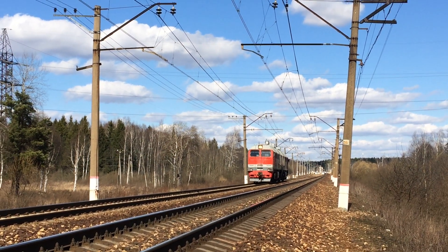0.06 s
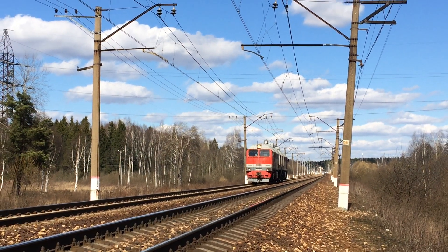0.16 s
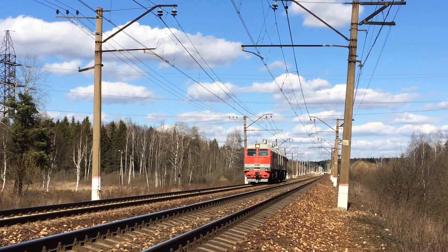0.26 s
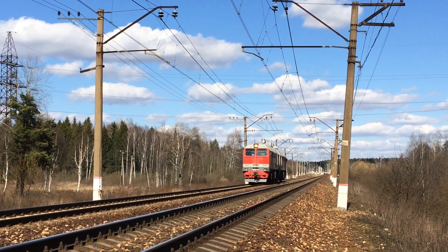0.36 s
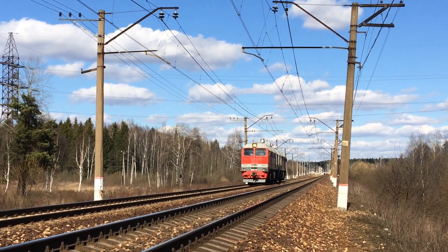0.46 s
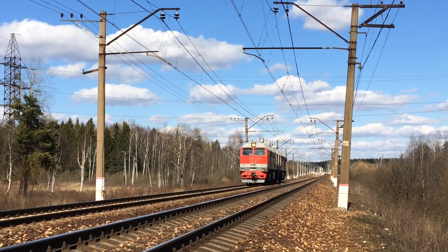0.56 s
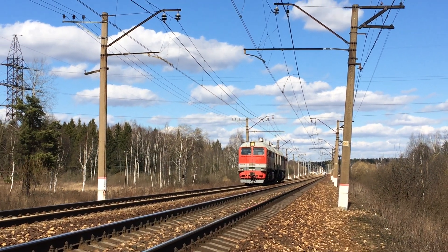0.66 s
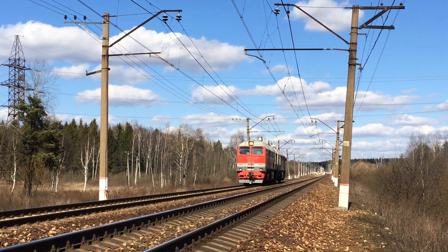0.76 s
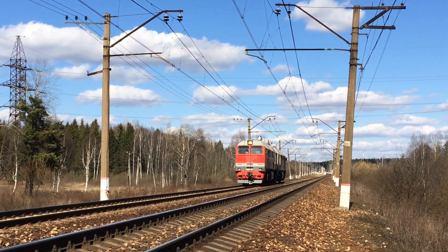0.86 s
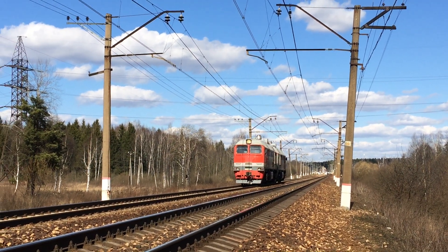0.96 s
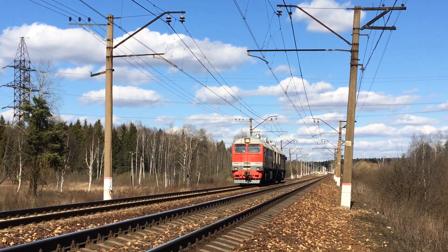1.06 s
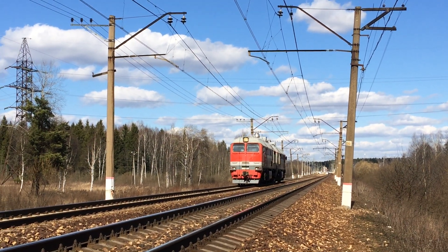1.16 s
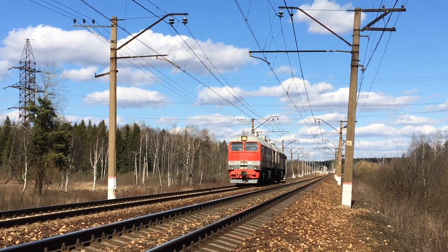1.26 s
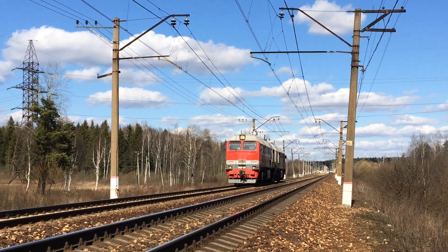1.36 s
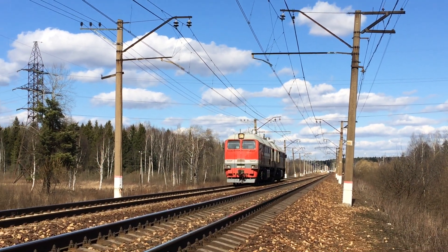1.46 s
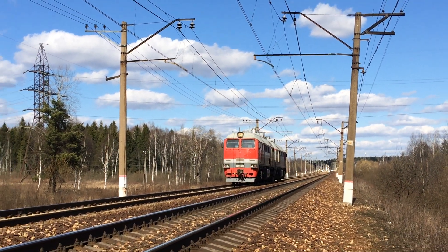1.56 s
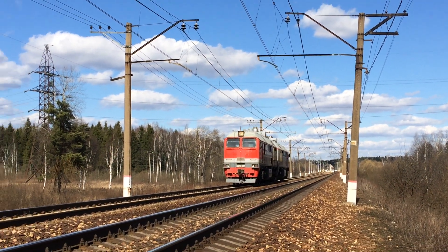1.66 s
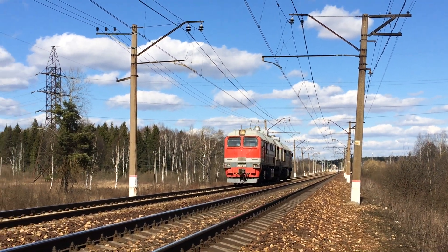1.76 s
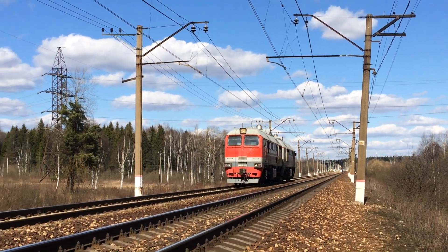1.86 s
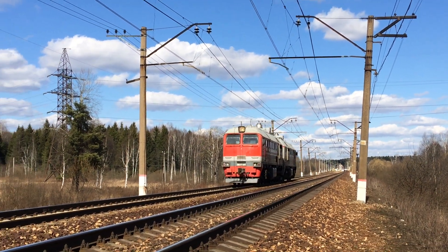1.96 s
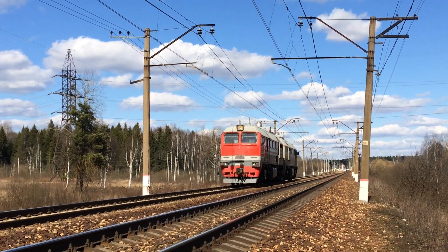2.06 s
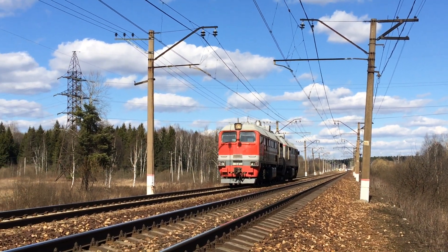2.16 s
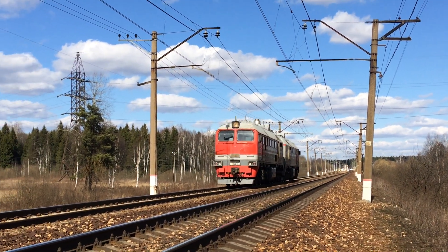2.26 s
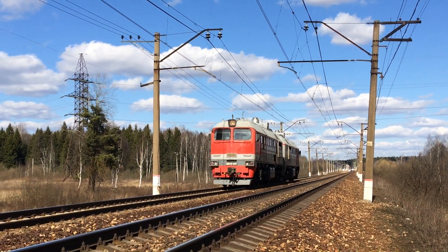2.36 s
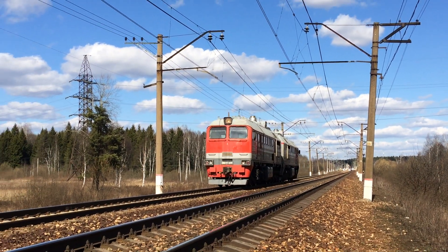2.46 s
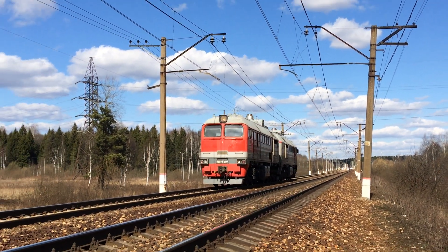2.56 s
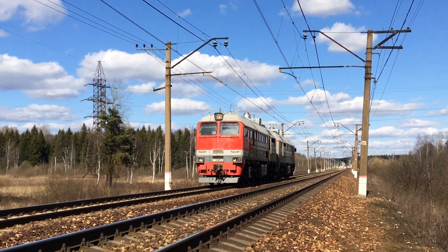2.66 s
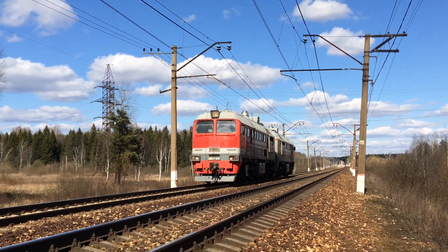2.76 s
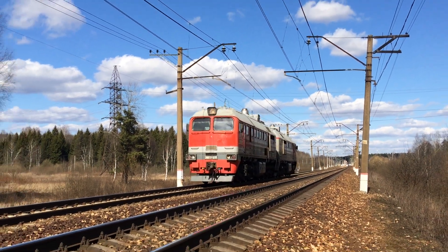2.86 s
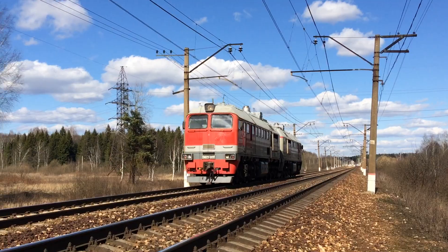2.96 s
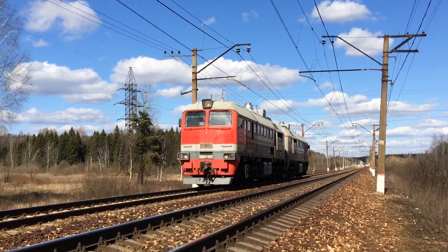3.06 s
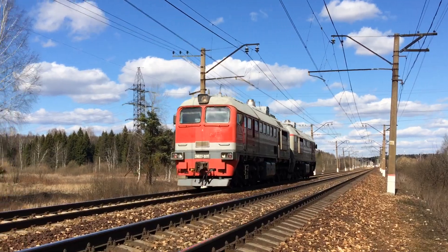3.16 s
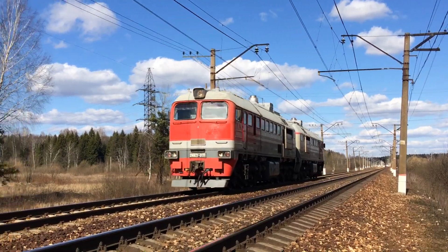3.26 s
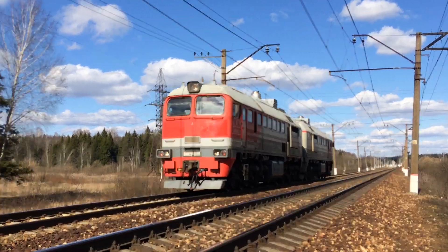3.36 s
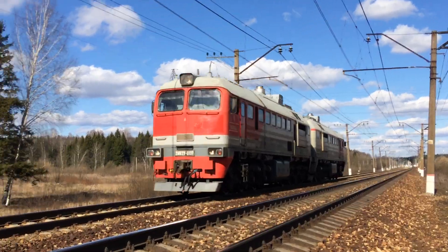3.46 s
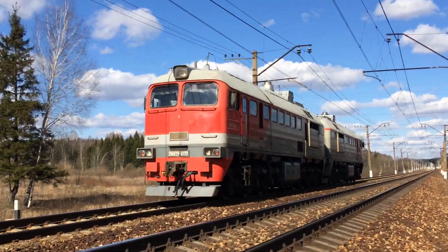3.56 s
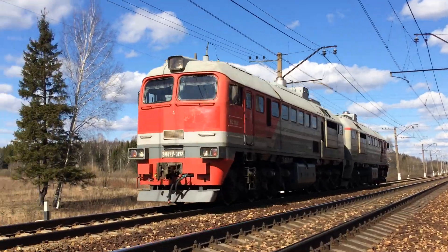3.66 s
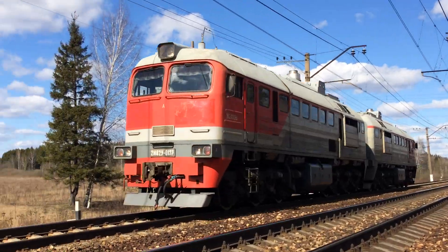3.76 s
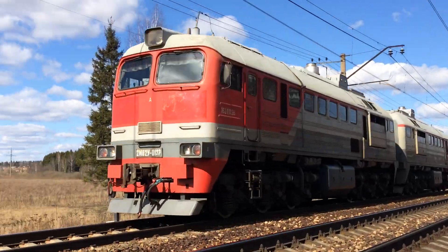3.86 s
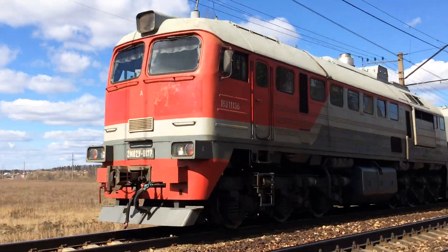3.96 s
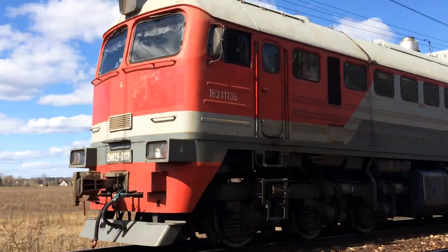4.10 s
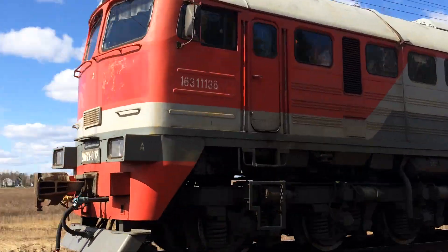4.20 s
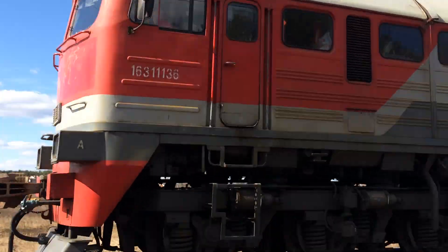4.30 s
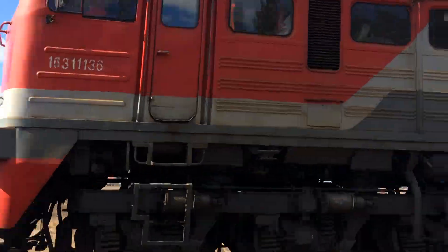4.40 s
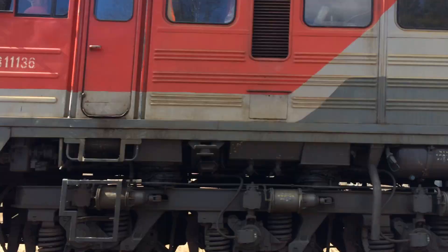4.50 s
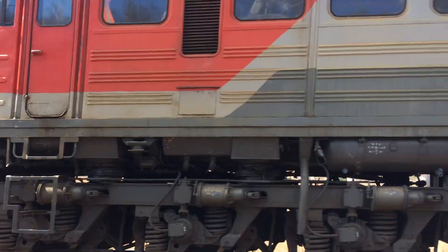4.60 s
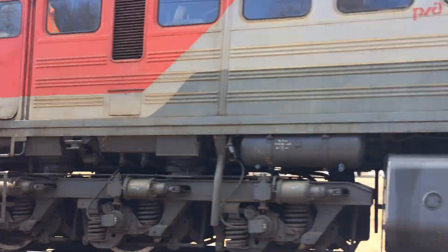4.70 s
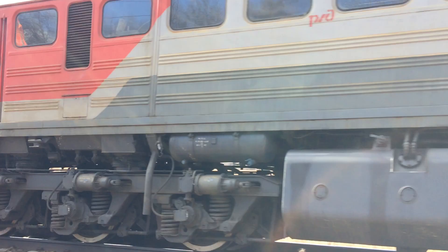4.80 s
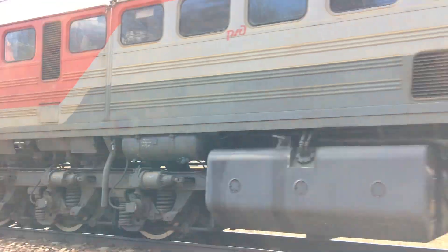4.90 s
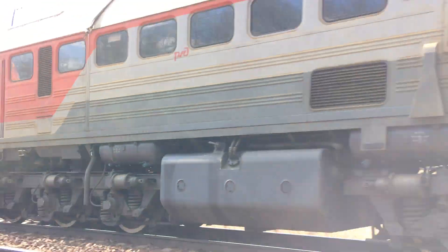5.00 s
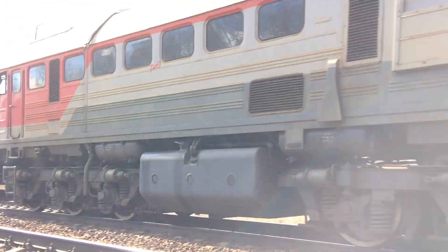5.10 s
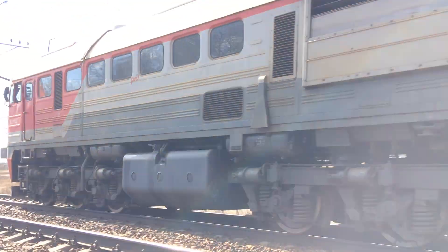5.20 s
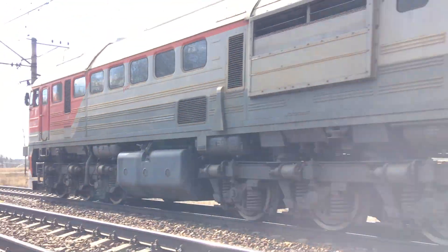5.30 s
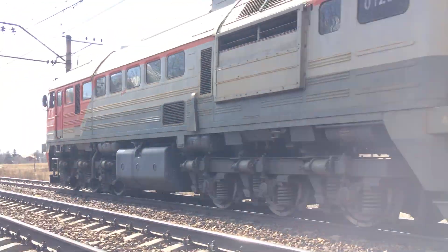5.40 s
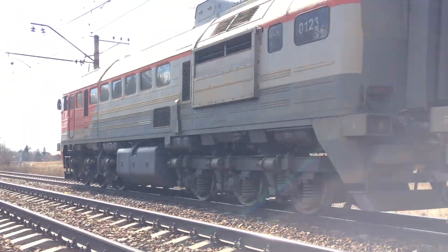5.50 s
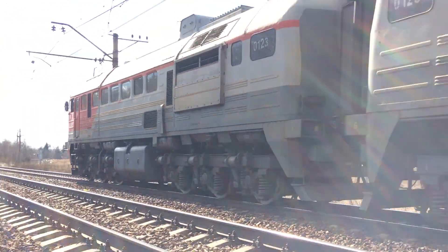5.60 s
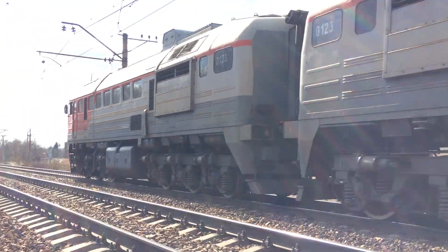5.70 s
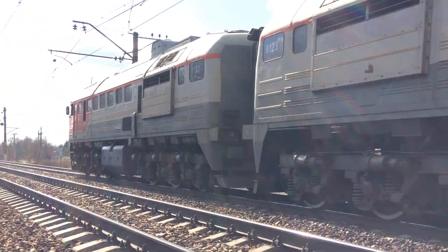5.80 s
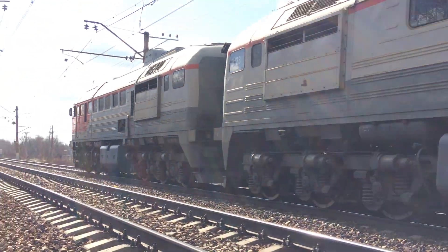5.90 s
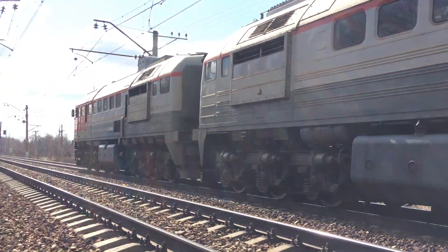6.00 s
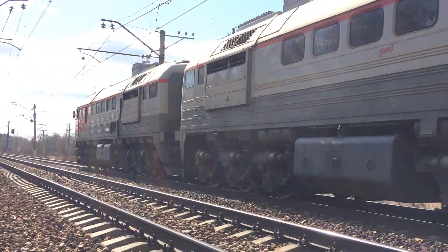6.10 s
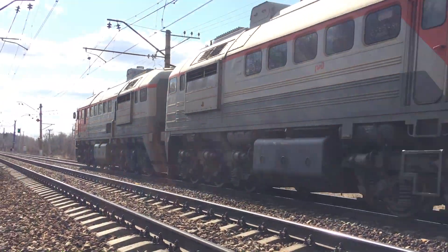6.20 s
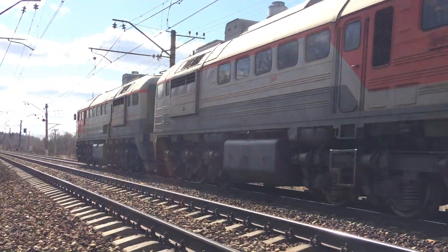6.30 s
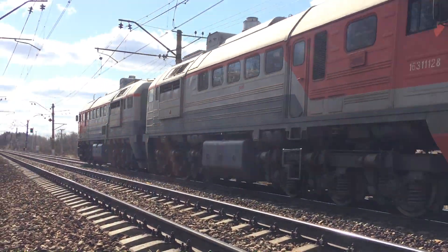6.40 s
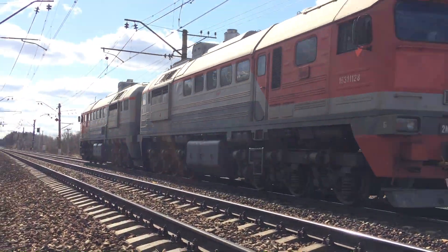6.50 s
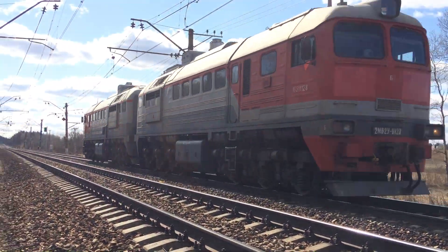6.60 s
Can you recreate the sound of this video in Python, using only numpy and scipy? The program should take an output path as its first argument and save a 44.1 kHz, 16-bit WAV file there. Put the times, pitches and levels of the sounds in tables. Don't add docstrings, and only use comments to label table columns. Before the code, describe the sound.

Outdoors beside a railway at a wood's edge, a small trackside microphone hears faint, dull rolling and a low engine flutter slowly approaching. One short, shrill air-whistle toot sounds and echoes softly from the trees. The rumble then rises quickly into a close, rough roar, with wheels beating about six times a second, frame groans, a metal clang, exhaust pops and a quick double spit of air. It stays loud to the end, easing only slightly.

```python
import sys
import numpy as np
from scipy import signal
from scipy.fft import rfft, irfft, next_fast_len
from scipy.io import wavfile

SR = 44100
rng = np.random.default_rng(int(sys.argv[2]) if len(sys.argv) > 2 else 0)


def materialize(psi):
    bounded = np.clip(np.atleast_2d(psi).T, -1, 1)
    quanta = np.round(bounded * 32767).astype(np.int16)
    wavfile.write(sys.argv[1], SR, quanta)


def natural_amplitude(level_db):
    exponent = np.asarray(level_db, float) / 20
    return 10 ** exponent


N = 293265
TIME = np.arange(N) / SR


def unit_rms(x):
    return x / np.sqrt(np.mean(x ** 2) + 1e-20)


def in_time(rows):
    s, *columns = np.transpose(rows)
    return [np.interp(TIME, s, column) for column in columns]


def drift(rate):
    pole = np.exp(-80 * np.pi * rate / SR)
    draws = rng.standard_normal(N // 40 + 2002)
    slow = signal.lfilter([1], [1, -2 * pole, pole * pole], draws)[2000:]
    return np.interp(np.arange(N) / 40, np.arange(len(slow)), unit_rms(slow))


def noise(spectrum, patchy_db=0.0, low_hz=None, high_hz=None):
    size = next_fast_len(N)
    octave = np.log2(np.arange(size // 2 + 1) * SR / size + 1)
    hz, level_db = np.transpose(spectrum)
    colour_db = np.interp(octave, np.log2(hz), level_db, left=-99, right=-99)
    lines = rfft(rng.standard_normal(size)) * natural_amplitude(colour_db)
    start, stop = np.log2(low_hz or hz[0]), np.log2(high_hz or hz[-1])
    out = 0
    for centre in np.arange(start, stop + .25, .5):
        band = np.cos(np.pi * np.clip(octave - centre, -.5, .5)) ** 2
        out = out + irfft(lines * band, size)[:N] * natural_amplitude(patchy_db * drift(19.6))
    return unit_rms(out)


def ring(at_s, heights, hz, t60):
    clicks = np.full(N, 1e-18)
    clicks[(np.atleast_1d(at_s) * SR).astype(int)] = heights
    pole, turn = natural_amplitude(-60 / (t60 * SR)), 2 * np.pi * hz / SR
    return signal.lfilter([0, np.sin(turn)], [1, -2 * pole * np.cos(turn), pole * pole], clicks)


def resonances(modes):
    out = 0
    for hz, width_hz, level_db in modes:
        pole, turn = np.exp(-np.pi * width_hz / SR), 2 * np.pi * hz / SR
        poles = [1, -2 * pole * np.cos(turn), pole * pole]
        sung = signal.lfilter([1, 0, -1], poles, rng.standard_normal(N))
        out = out + natural_amplitude(level_db + 4.7 * drift(26)) * unit_rms(sung)
    return unit_rms(out)


def swells(beats, rise_s, fall_s):
    out, coarse = 0, TIME[::32]
    for s, level_db in beats:
        late = coarse - s
        out = out + natural_amplitude(level_db) * np.exp(-.5 * (late / np.where(late < 0, rise_s, fall_s)) ** 2)
    return np.interp(TIME, coarse, out)


def surges(rows):
    return sum(swells([(s, level_db)], half_s, half_s) for s, level_db, half_s in rows)


def bell_db(at_s, rise_s, fall_s):
    late = TIME - at_s
    fall = 10 / np.log(10) * (late / np.where(late < 0, rise_s, fall_s)) ** 2
    return np.maximum(-fall, -99)


# time in seconds, rolling level in dB.
ROLLING_LEVEL = [(0.0, -48.5), (0.74, -46.5), (1.44, -43), (1.94, -43), (2.7, -40),
                 (3.2, -35), (4.1, -28), (4.4, -21.5), (5.16, -22), (5.78, -22), (6.28, -22.5), (6.5, -25), (6.65, -26)]


def nearing(share, early_s=0.0):
    s, level_db = np.transpose(ROLLING_LEVEL)
    abreast_db = -23
    return share * (np.interp(TIME + early_s, s, level_db) - abreast_db)


# time in seconds, level in dB.
VALVE_PUFFS = [(6.055, -33), (6.094, -33)]


def puffs(rise_s, t60):
    out = 0
    for s, level_db in VALVE_PUFFS:
        late = np.maximum(TIME - s + rise_s, 0)
        opening = np.minimum(late / rise_s, 1) ** 2
        out = out + opening * natural_amplitude(level_db - 60 * np.maximum(late - rise_s, 0) / t60)
    return out


# frequency in Hz, level in dB per Hz.
VALVE_COLOUR = [(5000, -33), (7500, -5), (9000, -12), (10200, -1), (12500, -4), (15500, -5)]
VALVE_TOP = [(11000, -25), (13000, 1), (14500, 0), (15500, 2)]
AIR_COLOUR = [(7000, -20), (9400, -3), (10300, 7), (11500, 6), (13000, 7.5), (15500, 4.5)]


def air():
    spit = puffs(rise_s=.006, t60=.26) * noise(VALVE_COLOUR, 1.0)
    thin_top = natural_amplitude(-8) * puffs(rise_s=.022, t60=.36) * noise(VALVE_TOP, 1.2)
    lost_db = 12 * np.clip((TIME - 4.8) / .25, 0, 1)
    hiss_db = -61.5 + nearing(0.46, 0.97) - lost_db
    return spit + thin_top + natural_amplitude(hiss_db) * noise(AIR_COLOUR, 1.6)


# time in seconds, level in dB.
GROAN_JOLTS = [(3.69, -17.5), (3.9, -22.5), (4.1, -22.5), (4.25, -12), (4.38, -22), (4.52, -13.5),
               (4.92, -12), (5.04, -18), (5.2, -20), (5.33, -17), (5.68, -25), (5.79, -20), (6.3, -20)]
# time in seconds, level in dB, half length in seconds.
LOUVRE_GUSTS = [(4.032, -42, .02), (4.37, -44, 0.045), (4.676, -46, 0.12), (4.935, -35, 0.01),
                (5.3, -46.5, 0.21), (5.773, -39, 0.05), (6.264, -45, .15)]
# frequency in Hz, level in dB per Hz.
GROAN_COLOUR = [(300, -36), (360, -1), (400, 4.5), (450, 4), (500, -16), (600, -53)]
LOUVRE_COLOUR = [(2500, -10), (3000, -1), (3500, -2), (4200, -6), (4800, -9.5)]


def body():
    groan = natural_amplitude(-31.5 + nearing(1.22)) + natural_amplitude(-10.5) * swells(GROAN_JOLTS, rise_s=0.015, fall_s=0.014)
    fan = natural_amplitude(-43 + nearing(1.23)) + surges(LOUVRE_GUSTS)
    return groan * noise(GROAN_COLOUR) + fan * noise(LOUVRE_COLOUR, 1.3)


# time in seconds, peak level in dB.
AIR_BUMPS = [(2.254, -19), (2.419, -33), (2.582, -15), (2.614, -17), (3.254, -30), (3.385, -9),
             (3.819, -15), (3.869, -21)]
# frequency in Hz, level in dB, decay t60 in seconds.
PLATE_MODES = [(1470, -13.5, 0.053), (1692, -15.5, .11), (1840, -38, 0.062), (2594, -28, 0.013)]
# time in seconds, level in dB relative to the main clang.
PLATE_RATTLES = [
    (3.839, -18),
    (4.495, -8.5),
    (4.657, -8),
]
# time in seconds, peak level in dB, pitch in Hz.
EXHAUST_POPS = [(4.179, -12, 440), (4.301, -22, 204), (4.367, -23, 395), (4.499, -29, 441),
                (4.619, -24, 250), (4.878, -16, 398), (5.001, -5, 393), (5.093, -4, 369),
                (5.136, -4.5, 405), (5.186, -6.5, 390), (5.224, -16, 374), (5.262, -16, 406),
                (5.309, -23, 358), (5.436, -4.5, 245), (5.512, -24, 368), (5.584, -19, 401),
                (5.631, -12, 342), (5.673, -5, 370), (5.783, -21, 438), (5.877, -9, 276),
                (6.039, -10, 204.3), (6.092, -6, 353), (6.158, -16.5, 370), (6.278, -9, 387),
                (6.423, -11.5, 348), (6.554, -17, 328), (6.598, -19, 210)]


def knocks():
    pops = sum(ring(s, natural_amplitude(level_db - 4), hz, .035) for s, level_db, hz in EXHAUST_POPS)
    s, level_db = np.transpose(AIR_BUMPS)
    bumps = ring(s, -natural_amplitude(level_db - 12.0), 100, 0.047)
    soft = signal.sosfilt(signal.butter(2, 700, fs=SR, output="sos"), pops + bumps)
    clang_s = 5.008
    s, below_db = np.transpose(PLATE_RATTLES + [(clang_s, 0)])
    plate = sum(ring(s, natural_amplitude(level_db + below_db), hz, t60) for hz, level_db, t60 in PLATE_MODES)
    return soft + plate


# time in seconds, level in dB, half length in seconds.
EXHAUST_SURGES = [(0.036, -41, .03), (.19, -43, 0.025), (0.29, -44, 0.082), (0.626, -41.5, 0.052),
                  (0.762, -45, 0.022), (0.963, -42.5, 0.09), (1.302, -37.5, 0.038), (1.41, -36, 0.016),
                  (1.644, -43, 0.054), (1.883, -45, 0.017), (2.046, -53, .05), (2.584, -60, 0.042),
                  (3.067, -51, 0.014), (3.265, -29, 0.015), (3.38, -32, .025), (3.584, -30.5, 0.048),
                  (3.72, -41, 0.015), (3.88, -29.5, 0.06), (4.293, -28, 0.056), (4.5, -35, 0.032),
                  (4.665, -30.5, 0.073), (4.79, -30, 0.012), (4.968, -29.5, 0.091), (5.208, -36, 0.071),
                  (5.406, -31, 0.044), (5.73, -28.5, 0.085), (5.857, -30, 0.015), (6.033, -28.5, 0.051),
                  (6.34, -27.5, 0.084), (6.603, -31, 0.038)]
# frequency in Hz, level in dB per Hz.
DRONE_RUMBLE = [(15, -30), (30, -20), (45, -18), (60, -7.5), (85, 2), (110, -18.5), (150, -20), (250, -20)]


def drone():
    steady = natural_amplitude(-37.5 + nearing(0.69, 0.23) + 3.2 * drift(8))
    level = steady + surges(EXHAUST_SURGES)
    phase = 2 * np.pi * np.cumsum(54.2 * (1 + .1 * drift(20))) / SR
    note = np.sin(phase)
    note = note + 0.42 * natural_amplitude(2.9 * drift(7.4)) * np.sin(2 * phase + 0.55)
    note = note + 0.11 * natural_amplitude(2.4 * drift(20.0)) * np.sin(3 * phase)
    return level * unit_rms(note + .45 * noise(DRONE_RUMBLE))


# frequency in Hz, level in dB per Hz.
FAR_COLOUR = [(120, -40), (160, -19.5), (250, -13.5), (440, -9.5), (630, -21.5), (960, -16.5),
              (1160, -22.5), (1710, -21), (2100, -31), (2590, -37), (3030, -37.5), (5000, -44.5),
              (8800, -74), (11000, -72)]
NEAR_COLOUR = [(120, 0.5), (150, -7), (220, 4.5), (330, 0), (420, -4.5), (590, -10.5), (870, -7.5),
               (1160, -14), (1710, -10), (2530, -23.5), (3550, -23), (7500, -30.5), (8500, -37.5),
               (15500, -47.5)]
# time in seconds, near share from 0 to 1.
NEARNESS = [(0, 0.01), (3.0, 0.31), (4.4, 1), (6.65, 0.94)]
# level abreast in dB, share of the swing, seconds by which it is heard earlier.
ROLLING = [
    (-27, 1.27, -0.026),
    (-29.5, 0.93, -0.079),
    (-35.5, 1.086, 0.091),
]
# time in seconds, change in dB, rise in seconds, fall in seconds.
PASSES = [
    [(3.8, 6, .25, 0.17), (5.7, 1.5, 0.11, .2)],
    [(4.0, -3.5, .2, .15), (5.75, 2.5, 0.14, 0.25)],
    [(3.24, 5, 0.31, 0.34), (5.85, -2, .3, 0.31)],
]


def roar():
    near, = in_time(NEARNESS)
    near = np.clip(near, 0, 1)
    bands_hz = [(140, 400), (560, 1600), (2240, 13000)]
    out = 0
    for (level_db, share, early_s), passes, (low, high) in zip(ROLLING, PASSES, bands_hz):
        for s, change_db, rise_s, fall_s in passes:
            level_db = level_db + change_db * natural_amplitude(bell_db(s, rise_s, fall_s))
        far_part = np.sqrt(1 - near) * noise(FAR_COLOUR, 1.56, low, high)
        near_part = np.sqrt(near) * noise(NEAR_COLOUR, 1.48, low, high)
        out = out + natural_amplitude(level_db + nearing(share, early_s)) * (far_part + near_part)
    return out


TURNS_DB = [-48, -52, -52, -43, -41.5, -41, -39, -38, -40, -45.5, -36, -35, -31, -32, -24, -30.5, -48, -21]
# time in seconds, level in dB.
BOGIE_THUDS = [(4.503, -19.5), (4.682, -31), (4.854, -23), (5.023, -22), (5.148, -29), (5.35, -23),
               (5.477, -25.5), (5.633, -25), (6.133, -27.5), (6.303, -23.5), (6.472, -22.5)]
# time in seconds, level in dB.
RAIL_CLACKS = [(1.488, -53), (1.845, -66), (2.0, -54), (2.166, -50), (2.346, -49), (2.504, -52),
               (2.683, -59), (3.223, -45), (3.36, -29.5), (3.523, -32.5), (3.685, -27), (3.863, -23),
               (4.033, -20), (4.194, -19.5), (4.355, -17), (4.507, -18), (4.665, -19), (4.837, -21.5),
               (5.016, -23.5), (5.198, -28), (5.38, -26), (5.54, -32), (5.671, -32), (5.851, -36.5),
               (6.065, -39), (6.262, -31), (6.439, -28.5)]
# frequency in Hz, level in dB per Hz.
THUD_COLOUR = [(90, -61), (150, -9), (200, -7), (300, -2), (380, -12), (600, -13.5)]
CLACK_COLOUR = [(300, -34), (450, 6.5), (550, -1.5), (710, 1), (830, 3), (950, 3), (1250, -4.5),
                (1700, -9.5), (2200, -3), (2700, -15), (4400, -14.5), (9000, -34.5), (14000, -66)]
# frequency in Hz, width in Hz, level in dB.
WHEEL_MODES = [(656, 40, 0.5), (940, 14.7, -2), (1550, 320, -1.5), (1813, 39, -1.5), (3760, 410, -26)]


def wheel_beat():
    turn_s, last_turn_s = .1632, 4.378
    turns = [(last_turn_s - k * turn_s, level_db) for k, level_db in enumerate(TURNS_DB[::-1])]
    thuds = swells(turns + BOGIE_THUDS, rise_s=0.011, fall_s=0.027) * noise(THUD_COLOUR, 0.4)
    rattle = unit_rms(natural_amplitude(1.2 * drift(70)) * noise(CLACK_COLOUR, 2.2))
    beat = swells(RAIL_CLACKS, rise_s=.029, fall_s=0.028)
    singing = 0.3 * beat + natural_amplitude(-38.5 + nearing(1.0))
    return thuds + 0.61 * beat * rattle + singing * resonances(WHEEL_MODES)


def trees(x):
    late = np.arange(SR // 2) / SR
    t60 = .5
    scatter = rng.standard_normal(len(late)) * natural_amplitude(-60 * late / t60) * (late > .03)
    dull = signal.sosfilt(signal.butter(2, 3000, fs=SR, output="sos"), x)
    return natural_amplitude(-24) * signal.fftconvolve(dull, scatter / np.sqrt(np.sum(scatter ** 2)))[:N]


def tone(phase, level_db, flutter_db):
    line = natural_amplitude(flutter_db * drift(25.0)) * np.sin(phase + 0.18 * flutter_db * drift(38.3))
    skirt = 0.17 * flutter_db * (drift(66) * np.sin(phase) + drift(130) * np.cos(phase))
    return np.sqrt(2) * natural_amplitude(level_db) * (line + skirt)


# time in seconds, pitch in Hz, tone level in dB, jet hiss level in dB.
TOOT = [(2.74, 710, -62, -75), (2.762, 708, -38, -58), (2.785, 706, -28, -43), (2.815, 701, -28, -33),
        (2.85, 687, -27.5, -29.5), (2.94, 682.5, -27, -30), (2.995, 684, -28.5, -33.5),
        (3.055, 685, -32.5, -45), (3.19, 682, -54, -78)]
# multiple of the pitch, level in dB.
TOOT_ORDERS = [(1, -0.5), (2, -12), (3, -2.5), (4, -7.5), (5, -7.5), (7, -15), (8, -18)]
# offset in multiples of the pitch, level in dB.
SIDEBANDS = [(-3, -12), (-2, -5), (-1, -24), (0, 1), (1, -1), (2, 3), (3, -2), (4, -10)]
# frequency in Hz, level in dB per Hz.
JET_COLOUR = [(400, -23.5), (1500, -7), (2200, -4), (3000, -1), (4400, 5), (5500, 3.5), (7000, -1),
              (10000, -5), (15500, -11)]
# time in seconds, pitch in Hz, level in dB.
SIGH = [(2.97, 640, -70), (3.01, 646, -47), (3.085, 642, -49), (3.135, 638, -53), (3.2, 630, -68)]


def whistle():
    hz, level_db, hiss_db = in_time(TOOT)
    over_s = 2.88
    starved_db = 2 * np.minimum(hiss_db + 33, 0)
    over_db = -30 + bell_db(over_s, .06, .03) + starved_db
    taken = .85 * natural_amplitude(bell_db(over_s + .015, 0.04, 0.028))
    bright = np.clip(.92 - taken + .04 * np.minimum(level_db + 31, 0), 0, 1)
    phase = 2 * np.pi * np.cumsum(hz) / SR
    out = 0
    for k, order_db in TOOT_ORDERS:
        dulled_db = 4.5 * (k - 1) * (1 - bright)
        out = out + tone(k * phase, level_db + order_db - dulled_db, .6 + .35 * k)

    sixth_rest_db = level_db - 17 + bell_db(2.79, .1, 0.13)
    sixth_db = np.maximum(-31 + bell_db(2.975, .035, .035), sixth_rest_db)
    out += tone(6 * phase, sixth_db, 1.2)
    mode = 2 * np.pi * 3567 * TIME
    out += sum(tone(mode + k * phase, over_db + side_db, 1.8) for k, side_db in SIDEBANDS)

    sigh_hz, sigh_db = in_time(SIGH)
    slack = 2 * np.pi * np.cumsum(sigh_hz) / SR
    odd_orders = [(1, -9.0), (3, 0.5), (5, -1.0)]   # (multiple, dB)
    sigh = sum(tone(k * slack, sigh_db + order_db, 1.6) for k, order_db in odd_orders)
    out += sigh * (TIME > SIGH[0][0])
    out += natural_amplitude(hiss_db - .5) * noise(JET_COLOUR, .7)
    out *= (TIME > TOOT[0][0]) & (TIME < SIGH[-1][0])
    return out + trees(out)


def scene():
    mix = air() + body() + knocks() + drone() + roar() + wheel_beat() + whistle()
    return mix[None]


def roll_off(x):
    return signal.sosfilt(signal.butter(12, 15430, fs=SR, output="sos"), x)


def record(dry):
    cut = signal.sosfilt(signal.butter(2, 28, "high", fs=SR, output="sos"), dry)
    return roll_off(cut)


dry = scene()
out = record(dry)
materialize(out)
```